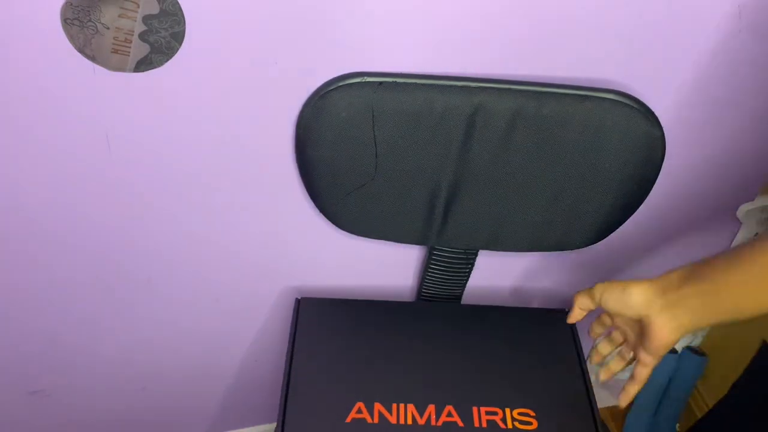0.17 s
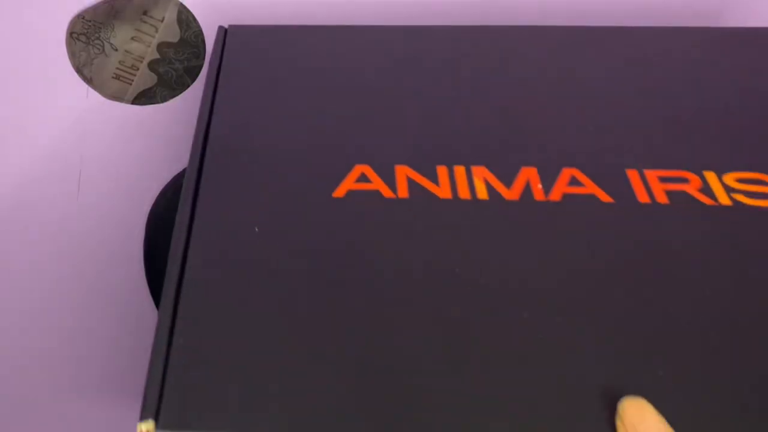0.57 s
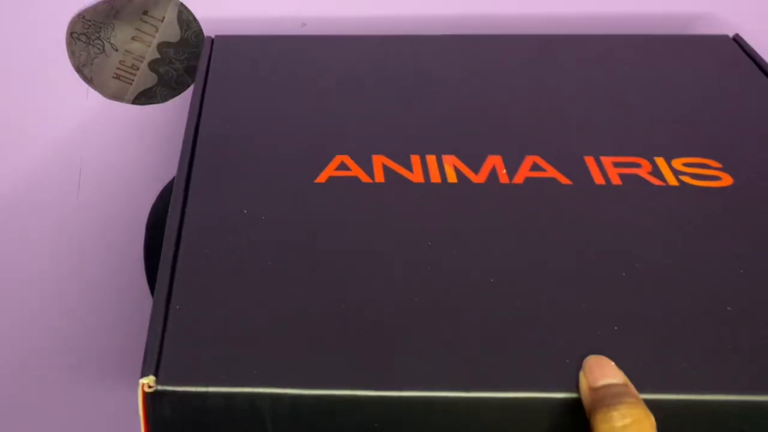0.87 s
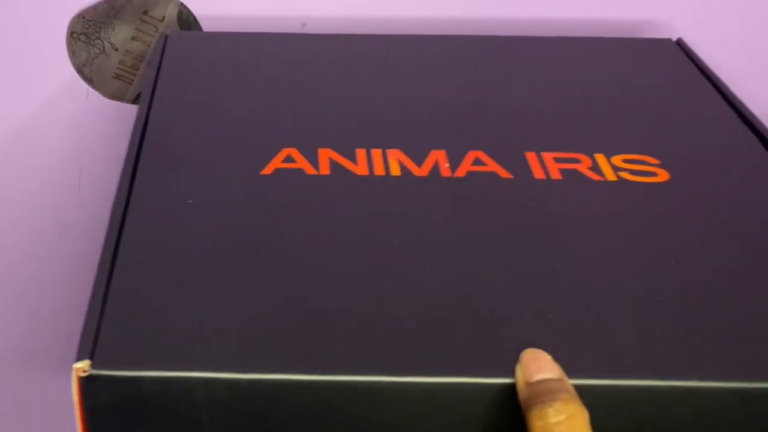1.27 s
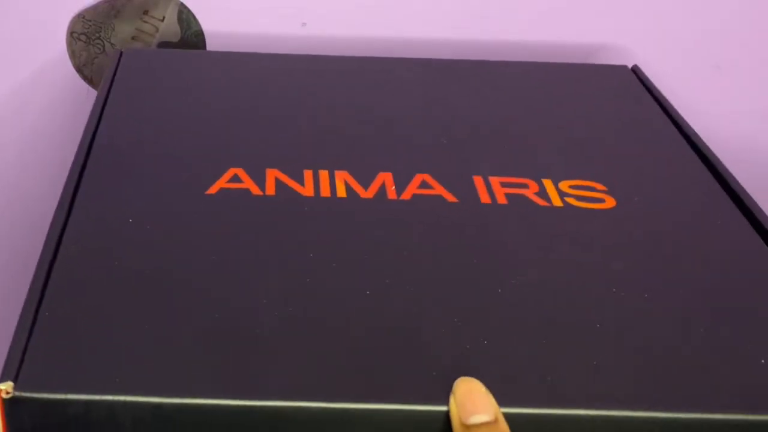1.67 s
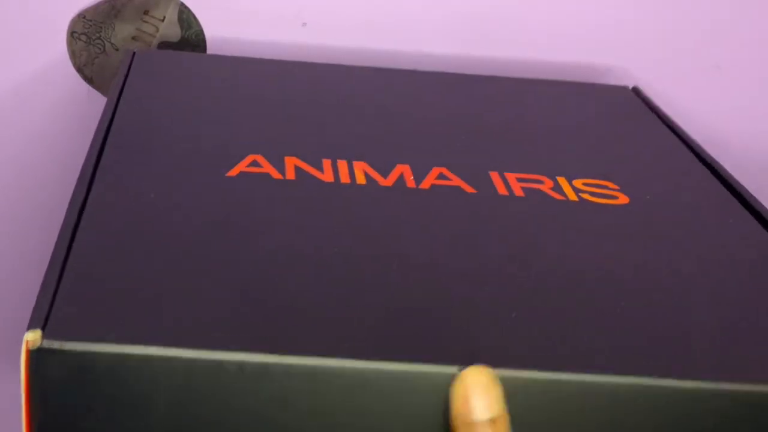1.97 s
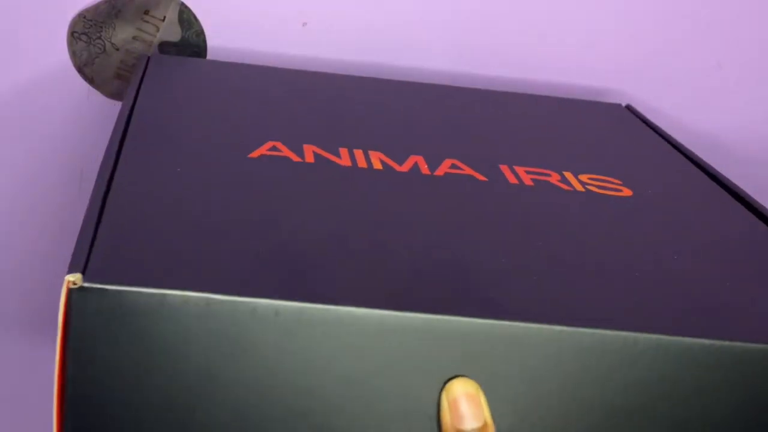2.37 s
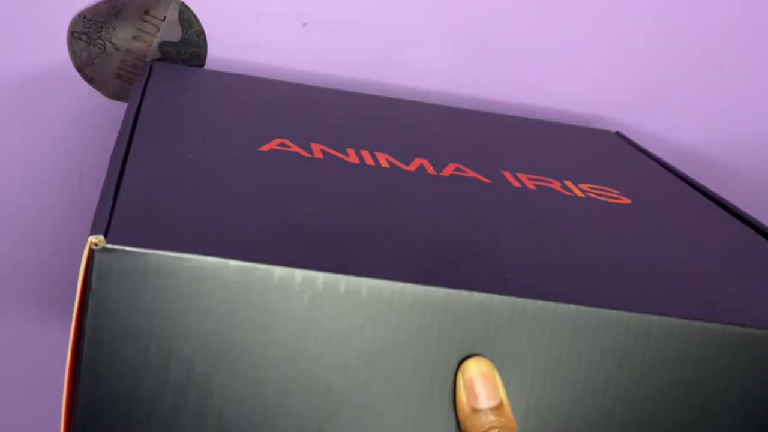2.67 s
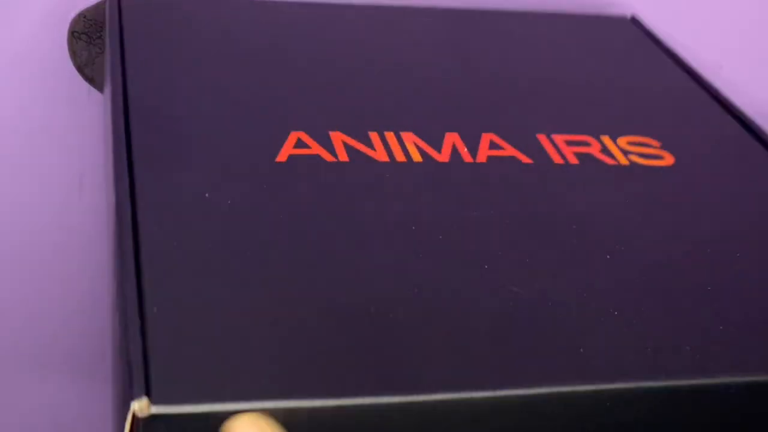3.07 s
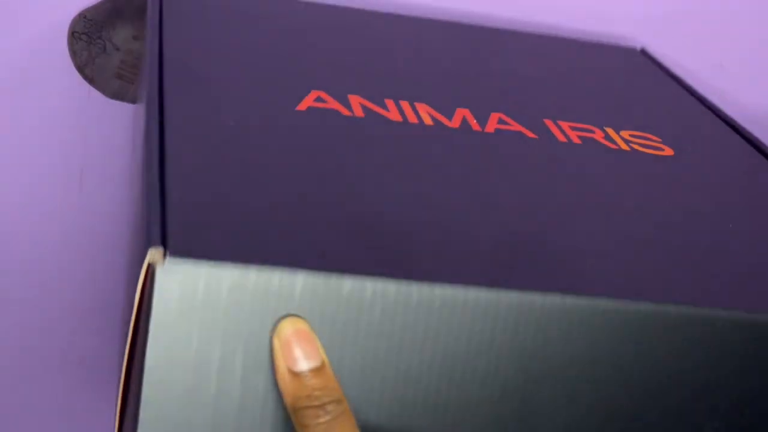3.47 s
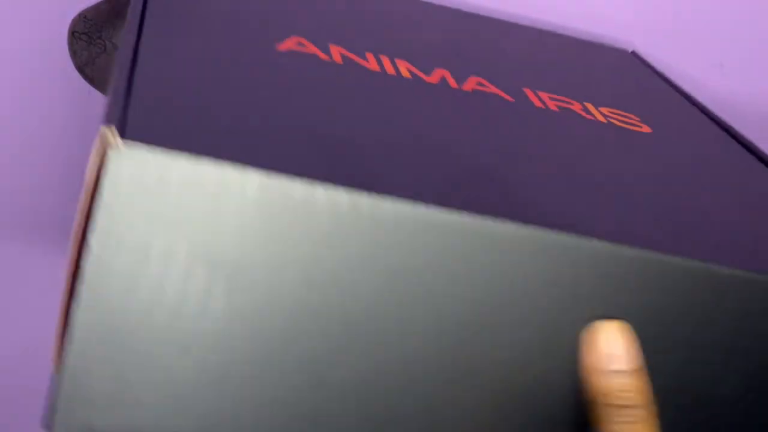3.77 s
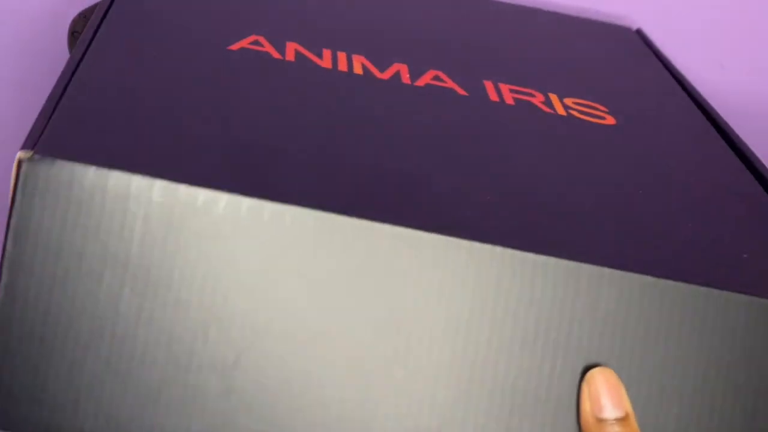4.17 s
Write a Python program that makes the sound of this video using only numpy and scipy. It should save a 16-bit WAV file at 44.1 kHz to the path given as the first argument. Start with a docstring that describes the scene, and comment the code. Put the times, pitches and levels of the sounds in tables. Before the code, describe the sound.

At about 0.03 s a large, hollow cardboard box lands on an office chair: a quick double knock, rattling panels and a deep boom with light hiss, breaking off near 0.4 s. Until 1.65 s it is almost silent, just low room air, very faint rubbing and a tiny tap near 1.0 s. From 1.7 s the lid is tugged: short hollow scrapes, boxy knocks and low judders around 1.75 and 1.95 s, more rubbing to 2.3 s. A bright, creaky snap comes at 2.42 s, then a lull with small ticks. A hard clap hits at 2.9 s with papery hiss; the strongest tug at 3.28-3.3 s cracks twice and jolts the chair into a low boom, with another knock at 3.38 s. Scraping, hiss and buzzing judders peak at 3.55-3.75 s, ease by 4.0 s, and a final rough slide runs from 4.1 s to the end. Small room, close stereo microphone.

```python
"""A large cardboard box lands on an office chair, which booms under it; a hand slides over the lid.
Then the lid is worked upwards until it comes free: flaps scrape, judder and snap past the walls.
Knocks and friction drive damped modes of panels, walls, flap edges and flutes; rasp and hiss are
shaped noise. Chair and judders are sines. Small room with diffuse echoes, steady air noise, close
stereo microphone."""
import sys
import numpy as np
from scipy import signal
from scipy.fft import rfft, irfft
from scipy.io import wavfile

SR = 44100
rng = np.random.default_rng(int(sys.argv[2]) if len(sys.argv) > 2 else 0)


def generate_wav(sig):
    """Save sig (samples, or channels by samples) to the path in sys.argv[1] as 16-bit PCM at SR."""
    pcm = np.round(np.clip(np.atleast_2d(sig).T, -1, 1) * 32767).astype(np.int16)
    wavfile.write(sys.argv[1], SR, pcm)


N = 190894
TIME = np.arange(N) / SR
LANDING_S = 0.03

# Spectrum of rasping fibres and cracks. Each row: frequency in Hz, relative level in dB per Hz.
RASP_SPECTRUM = [(1200, -8), (2100, -2), (2600, -1.5), (3500, -1.5), (4300, -7.5), (5100, -8),
                 (6200, -11.5), (7200, -8), (8500, -13), (10500, -10.5), (15500, -46.5)]


def from_db(db):
    """Decibels to gain."""
    return 10 ** (np.asarray(db) / 20)


def unit_energy(response):
    """Scale a response to keep the power of white noise."""
    return response / np.sqrt(np.mean(np.sum(response ** 2, axis=-1)))


def at_hz(points, hz):
    """Interpolate a table on a log-frequency axis."""
    table = np.array(points)
    return np.interp(np.log(hz + 1), np.log(table[:, 0]), table[:, 1])


def through(force, response):
    """Convolve a force with a response."""
    return signal.fftconvolve(np.atleast_2d(force), response, axes=-1)[:, :N]


def above(x, edge_hz):
    """Second-order high-pass, as small surfaces radiate little deep sound."""
    return signal.sosfilt(signal.butter(2, edge_hz, "high", fs=SR, output="sos"), x)


def decay(t, t60_s):
    """Falls by 60 dB in t60_s, silent before time zero."""
    return (t >= 0) * np.exp(-np.log(1000) * np.abs(t) / t60_s)


def swell(at_s, rise_s, fall_s):
    """Grows towards a moment and dies away after it, by a factor e per rise_s or fall_s."""
    return np.exp(-np.abs(TIME - at_s) / np.where(TIME < at_s, rise_s, fall_s))


def noise(spectrum):
    """Diffuse stereo noise of a given colour, its left-right likeness set by frequency; rms 1."""
    # Likeness of the two ports. Each row: frequency in Hz, correlation (limited to -1..1 below).
    likeness = [(140, 0.89), (280, 0.82), (600, -0.17), (1400, -0.03), (3500, 0.2), (7000, 0.54),
                (8400, -2.2), (9500, 1), (10800, 1), (11600, -2.8), (12600, -.9), (13400, .7), (14500, .6),
                (15500, -0.78)]
    hz = np.fft.rfftfreq(N, 1 / SR)
    alike = np.clip(at_hz(likeness, hz), -1, 1)
    mid, side = rfft(rng.standard_normal((2, N)))
    common = np.sqrt(1 + alike) * mid
    opposed = np.sqrt(1 - alike) * side * [[1], [-1]]
    x = irfft(from_db(at_hz(spectrum, hz)) * (common + opposed), N)
    return x / x.std()


def ringing(modes, t, spread_rad):
    """Damped modes of alternating sign; each reaches the two ports up to spread_rad apart."""
    out = 0
    for k, (hz, db, t60_s) in enumerate(modes):
        phase = spread_rad * rng.uniform(-0.92, 1) / 2 * np.array([[1], [-1]])
        mode = decay(t, t60_s) * np.sin(2 * np.pi * hz * t + phase)
        out = out + (-1) ** k * from_db(db) * mode
    return out


def grains(per_s, uneven_db):
    """Tiny slips of random size and sign at random moments; rms 1."""
    excess_db = uneven_db * np.minimum(rng.exponential(1, N), 4)
    sizes = from_db(excess_db) * rng.choice([-1, 1], N)
    x = sizes * (rng.random(N) < per_s / SR)
    return x / x.std()


def flutter(per_s, depth_db):
    """The uneven grip of a rough surface, as a gain of rms 1."""
    knots = np.arange(0, N / SR + 1, 1 / per_s)
    gain = from_db(depth_db * np.interp(TIME, knots, rng.standard_normal(len(knots))))
    return gain / np.sqrt(np.mean(gain ** 2))


def air():
    """Steady coloured noise of the room's air."""
    # Each row: frequency in Hz, relative level in dB per Hz.
    air_spectrum = [(15, -52), (25, -28), (37, -6.5), (59, 0.5), (103, -9), (271, -15.5), (318, -18),
                    (354, -19), (621, -25), (2300, -33.5), (15000, -47.5)]
    return from_db(-49.5) * noise(air_spectrum)


def chair():
    """Chair modes boom at the landing over a steady hiss; both stop abruptly at 0.38 s. A later tug jolts the
    chair modes again."""
    # Chair and box base, struck together. Each row: frequency in Hz, level in dB, t60 in seconds.
    chair_modes = [(42.6, -22.5, 0.74), (66.2, -14.5, 0.61), (108.8, -17.5, 0.27), (210.6, -8, 0.22),
                   (357.4, -9, 0.14)]
    # A steady hiss from the start until the abrupt stop. Each row: frequency in Hz, relative level in dB per
    # Hz.
    early_hiss = [(100, 17.5), (300, 13), (700, 4.5), (2000, 1), (5000, -3.5), (11000, -9.5), (15000, -9)]
    hush_s, hush_ramp_s = 0.38, 0.0033
    jolt_s, jolt_db = 3.295, -9.5      # the hardest tug on the lid
    landing = ringing(chair_modes, TIME - LANDING_S, spread_rad=0.18)
    landing = landing + from_db(-42) * noise(early_hiss)
    jolt = from_db(jolt_db) * ringing(chair_modes, TIME - jolt_s, spread_rad=0.137)
    return landing * np.clip((hush_s - TIME) / hush_ramp_s, 0, 1) + jolt


def knocks(panels, walls):
    """A contact claps at its own pitch, chatters and cracks; walls ring, the panel thuds after."""
    # Board on board. Each row: start in seconds, relative clap level in dB, contact pitch in Hz,
    # relative panel thud level in dB.
    knock_rows = [(0.018, -21, 910, -28), (0.029, -16, 514, -10.5), (0.054, -28, 1040, -13),
                  (1.038, -57, 600, -35.5), (1.351, -69, 500, -47), (1.682, -52, 600, -37),
                  (1.709, -26.5, 506, -25), (1.919, -24, 1030, -14.5), (2.017, -27, 716, -38),
                  (2.175, -20, 625, -24), (2.298, -22, 604, -23), (2.42, -9.5, 2060, -30.5),
                  (2.612, -27.5, 704, -30), (2.643, -31, 1910, -54), (2.817, -23, 750, -25),
                  (2.856, -23, 1730, -30), (2.899, -3, 1544, -6), (2.96, -19.5, 1630, -17.5),
                  (3.173, -29, 496, -25), (3.279, -12, 1320, -15), (3.299, -7.5, 1600, -8.5),
                  (3.37, -7.5, 1150, -28.5), (3.382, -10, 1060, -43), (3.56, -13.5, 630, -25.5),
                  (3.66, -12.5, 1320, -20.5)]
    contact_t60_s = 0.0078      # at 1 kHz
    chatter_t60_s, crack_t60_s, crack_db = 0.052, 0.042, -24      # crack level is against the clap
    flex_s, thud_hz, thud_t60_s = 0.003, 225, 0.013      # flex_s delays the thud
    claps, pushes, cracks = np.zeros((3, N))
    t = TIME[:SR // 8]
    all_rebounds = rng.standard_normal((len(knock_rows), len(t)))
    for (at_s, clap_db, hz, thud_db), rebounds in zip(knock_rows, all_rebounds):
        start = int(at_s * SR)
        # fibres catch after the first touch
        chatter = unit_energy(rebounds * decay(t, chatter_t60_s) * (t > .001))
        touch = from_db(-1.5) * chatter
        touch[0] = 1
        clap = decay(t, contact_t60_s * np.sqrt(1000 / hz)) * np.sin(2 * np.pi * hz * t)
        claps[start:start + len(t)] += from_db(clap_db) * signal.fftconvolve(touch, clap)[:len(t)]
        cracks[start:start + len(t)] += from_db(clap_db + crack_db) * decay(t, crack_t60_s)
        pushes[start + int(flex_s * SR)] += from_db(thud_db)
    hollow = above(from_db(4.0) * claps + from_db(-13.5) * through(claps, walls), edge_hz=480)
    thud = above(decay(t, thud_t60_s) * np.sin(2 * np.pi * thud_hz * t), edge_hz=107)
    flexing = from_db(12.5) * through(pushes, [thud]) + from_db(15.5) * through(pushes, panels)
    return hollow + flexing + cracks * noise(RASP_SPECTRUM)


def power(db, shape):
    """Power of an envelope at a level."""
    return (from_db(db) * shape) ** 2


def friction():
    """Strengths of drum, scrape, creak, rasp and hiss: landing, pushes, slides, skids add in power."""
    # An edge drags along the board. Each row: start in seconds, end in seconds, then relative
    # levels in dB of wall scrape, panel drumming and fibre rasp.
    push_rows = [(0.10, 0.17, -48.5, -33, -64), (0.643, 0.97, -69.5, -63, -67.5),
                 (0.783, 0.812, -58, -47, -76), (0.957, 1.064, -56, -42.5, -65.5),
                 (1.254, 1.62, -82, -59.5, -75), (1.674, 1.70, -57, -36, -56),
                 (1.699, 1.774, -34, -24.5, -38.5), (1.811, 1.878, -42.5, -32, -48.5),
                 (1.894, 1.968, -35, -23, -46), (1.996, 2.157, -42.5, -37, -51.5),
                 (2.172, 2.306, -37.5, -29.5, -46.5), (2.35, 2.69, -51, -42.5, -64),
                 (2.677, 2.793, -54, -40.5, -82), (2.81, 3.082, -37, -30, -46),
                 (3.062, 3.17, -55.5, -45.5, -58.5), (3.164, 3.457, -41, -32, -50),
                 (3.455, 3.6, -41, -39, -53.5), (3.58, 3.784, -34, -27.5, -37.5),
                 (3.787, 3.941, -39.5, -36, -46.5), (4.094, 4.178, -36.5, -31.5, -41.5),
                 (4.17, 4.336, -40, -29.5, -45)]
    # Face over face. Each row: start in seconds, end in seconds, relative peak hiss level in dB.
    slide_rows = [(0.51, 1.142, -63.5), (1.25, 1.497, -70), (1.542, 1.605, -65), (1.698, 1.825, -49),
                  (1.913, 2.011, -35.5), (2.021, 2.113, -37), (2.17, 2.37, -53), (2.803, 3.169, -33.5),
                  (3.2, 3.338, -33.5), (3.311, 3.574, -41), (3.486, 3.997, -29.5), (4.059, 4.448, -33.5)]
    # A flap lets go and skids. Each row: peak time in seconds, rise in seconds, fall in seconds,
    # then relative levels in dB of scrape, creak and rasp.
    skid_rows = [(1.924, 0.011, 0.015, -25.5, -42, -33.5), (2.15, 0.14, 0.28, -52, -45, -72),
                 (2.42, 0.0032, 0.0076, -42, -14, -13.5), (2.477, 0.052, 0.024, -42.5, -30.5, -40),
                 (3.282, 0.023, 0.044, -24, -39.5, -31), (3.30, 0.0014, 0.0078, -22, -21, -19),
                 (3.383, 0.014, 0.037, -26.5, -37.5, -56), (3.699, 0.047, 0.036, -21, -22.5, -33.5)]
    grip_s, release_s = 0.013, 0.017
    drum, scrape, creak, rasp, glide = np.zeros((5, N))

    # the base beds down on the seat: panels and walls shake, the underside rasps over the cover
    settle = swell(LANDING_S, rise_s=0.017, fall_s=0.026)
    drum += power(-14.5, settle)
    scrape += power(-22.5, settle)
    rasp += power(-38, settle)

    for start_s, end_s, scrape_db, drum_db, rasp_db in push_rows:
        hold = np.clip((TIME - start_s) / grip_s, 0, 1)
        push = hold * np.exp(-np.maximum(TIME - end_s, 0) / release_s)
        scrape += power(scrape_db, push)
        drum += power(drum_db, push)
        rasp += power(rasp_db, push)
    for start_s, end_s, hiss_db in slide_rows:
        speed = np.sin(np.pi * np.clip((TIME - start_s) / (end_s - start_s), 0, 1))
        glide += power(hiss_db, speed ** 2)
    for at_s, rise_s, fall_s, scrape_db, creak_db, rasp_db in skid_rows:
        skid = swell(at_s, rise_s, fall_s)
        scrape += power(scrape_db, skid)
        creak += power(creak_db, skid)
        rasp += power(rasp_db, skid)

    # every scrape creaks a little, every slide rasps and every rasp hisses
    creak = creak + from_db(-21.5) ** 2 * scrape
    rasp = rasp + from_db(-11.5) ** 2 * glide
    hiss = glide + from_db(-7.5) ** 2 * rasp_without_slides(rasp, glide)
    return np.sqrt([drum, scrape, creak, rasp, hiss])


def rasp_without_slides(rasp, glide):
    """Power of the rasp that edges make, less the share from sliding faces."""
    return np.maximum(rasp - from_db(-11.5) ** 2 * glide, 0)


def rubbing(panels, walls):
    """Slips shake the panels, walls and flap edges; fibres rasp and the smooth faces hiss."""
    # A tight flap edge in its slot. Each row: frequency in Hz, relative level in dB, t60 in seconds.
    creak_modes = [(994, 0.5, 0.032), (1462, 2.5, 0.04), (1608, 2, 0.07), (1710, 3, 0.038),
                   (1902, 1.5, 0.046), (2038, 2, 0.052), (2330, -3.5, 0.022), (2515, -10.5, 0.074)]
    # Cut flutes along an edge. Each row: frequency in Hz, relative level in dB, t60 in seconds.
    flute_modes = [(2230, -2.5, 0.021), (3460, 1, 0.029), (3770, 0.5, 0.024), (4880, 1.5, 0.012),
                   (6720, -5, 0.011)]
    # Faces sliding. Each row: frequency in Hz, relative level in dB per Hz.
    hiss_spectrum = [(1500, -7), (4000, -0.5), (7000, -0.5), (9000, 0.5), (12200, -4.5), (14000, 2.5),
                     (15300, 1.5), (16000, 7)]
    drum, scrape, creak, rasp, hiss = friction()
    grip = flutter(per_s=160, depth_db=2.0)
    edge = unit_energy(above(ringing(creak_modes, TIME[:SR // 4], spread_rad=0.26), edge_hz=180))
    flutes = unit_energy(above(ringing(flute_modes, TIME[:SR // 8], spread_rad=1.22), edge_hz=800))

    drumming = from_db(-2.0) * through(drum * grip * grains(per_s=700, uneven_db=0.0), panels)
    scraping = from_db(1.5) * through(scrape * grip * grains(per_s=1800, uneven_db=3.6), walls)
    creaking = from_db(1.0) * through(creak * grains(per_s=4500, uneven_db=3.5), edge)
    roughness = grip * flutter(per_s=6100, depth_db=-3.0)
    fibres = from_db(0.5) * rasp * roughness * noise(RASP_SPECTRUM)
    # flutes ring when an edge leads, not when the faces lie flat
    edgewise = rasp / np.hypot(rasp, hiss)
    fluting = from_db(0.5) * through(edgewise * rasp * grains(per_s=2500, uneven_db=9.5), flutes)
    faces = from_db(6.5) * hiss * flutter(per_s=190, depth_db=1.8) * noise(hiss_spectrum)
    return drumming + scraping + creaking + fibres + fluting + faces


def judders():
    """The lid sticks and slips in a quick rhythm, driving a panel in a lopsided swing."""
    # Each row: centre in seconds, half length in seconds (to 1/e), mean slips per second, level in dB.
    judder_rows = [(1.766, 0.0093, 267, -16), (1.959, 0.045, 144, -24.5), (3.578, 0.014, 172, -15),
                   (3.689, 0.012, 260, -9.5), (3.916, 0.017, 199, -24.5)]
    out, waver = np.zeros(N), flutter(per_s=220, depth_db=0.9)
    for at_s, half_s, per_s, db in judder_rows:
        turn = 2 * np.pi * per_s * np.cumsum(waver) / SR
        swing = np.sin(turn) + from_db(-20.5) * np.sin(2 * turn)
        out += from_db(db) * np.exp(-((TIME - at_s) / half_s) ** 2) * swing
    return out


def office(x):
    """Adds diffuse echoes that set in after the nearest wall answers."""
    # Echo colour. Each row: frequency in Hz, relative level in dB per Hz.
    echo_spectrum = [(30, -8), (150, 1), (400, 1.5), (2000, -6), (6000, 0.5), (16000, -4.5)]
    wall_delay_s, room_t60_s, room_db = .005, 0.15, -10
    envelope = decay(TIME[:SR // 2] - wall_delay_s, room_t60_s)
    tail = unit_energy(noise(echo_spectrum)[:, :SR // 2] * envelope)
    return x + from_db(room_db) * through(x, tail)


def scene():
    """Box in the room, with the chair and steady air noise."""
    # Big hollow panels. Each row: frequency in Hz, relative level in dB, t60 in seconds.
    panel_modes = [(91, -11.5, 0.052), (148.3, -4.5, 0.12), (163.4, 4.5, 0.011), (210, -6.5, 0.11),
                   (281.7, -1, 0.028), (307, 2, 0.043), (344.5, -2.5, 0.031), (419, -5.5, 0.022)]
    # Stiff walls and flaps. Each row: frequency in Hz, relative level in dB, t60 in seconds.
    wall_modes = [(450, 1.5, 0.026), (612.6, 3.5, 0.039), (721.6, -1, 0.053), (870, 0.5, 0.032),
                  (1073, 1, 0.031), (1218, 2.5, 0.022), (1376, 1.5, 0.02), (1579, 1, 0.022),
                  (1868, 1, 0.046), (2190, -3, 0.016), (2830, -10, 0.026), (3760, -37, 0.013)]
    panels = unit_energy(above(ringing(panel_modes, TIME[:SR // 2], spread_rad=0.21), edge_hz=31.0))
    walls = unit_energy(above(ringing(wall_modes, TIME[:SR // 4], spread_rad=2.25), edge_hz=450))
    box = knocks(panels, walls) + rubbing(panels, walls) + judders()
    return office(box) + chair() + air()


def record(dry):
    """The left port hears slightly earlier; rumble and top are cut, peaks past full scale clip."""
    # The box shades the ports differently. Each row: frequency in Hz, left minus right in dB.
    shading = [(70, 1.5), (150, 0.3), (300, -3), (550, 5), (1100, 0.2), (2000, 0.5), (4500, 3.5), (9000, 0)]
    lead_s, cutoff_hz = .000018, 15900
    hz = np.fft.rfftfreq(N, 1 / SR)
    side = np.array([[.5], [-.5]])
    ports = from_db(side * at_hz(shading, hz)) * np.exp(2j * np.pi * hz * lead_s * side)
    heard = above(irfft(rfft(dry) * ports, N), edge_hz=19.6)
    low_pass = signal.ellip(10, .3, 70, cutoff_hz, fs=SR, output="sos")
    return np.clip(signal.sosfilt(low_pass, heard), -1, 1)


dry = scene()
out = record(dry)
generate_wav(out)
```